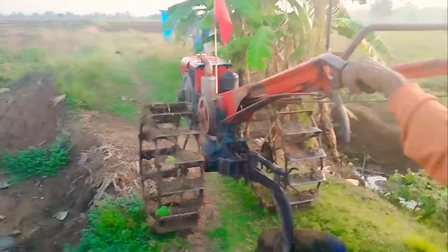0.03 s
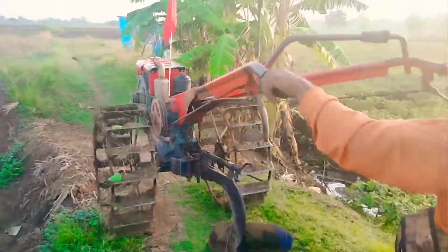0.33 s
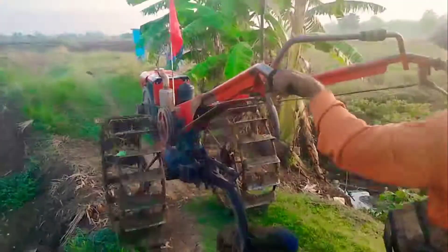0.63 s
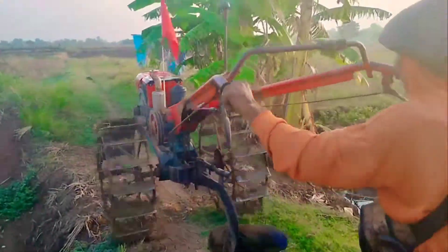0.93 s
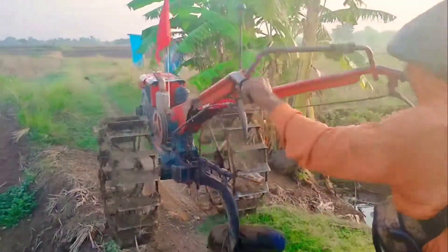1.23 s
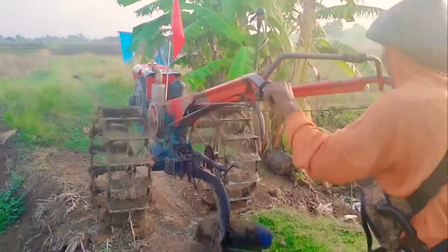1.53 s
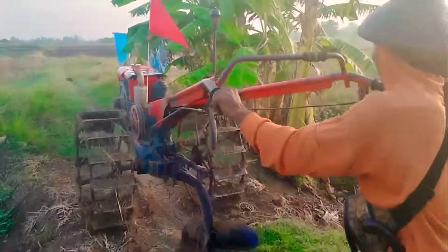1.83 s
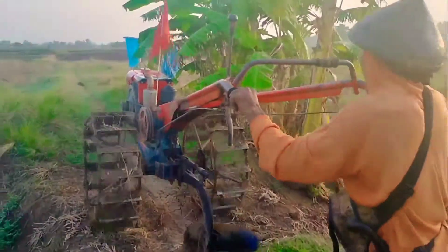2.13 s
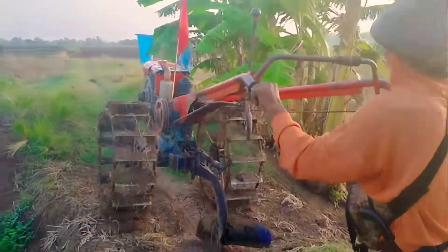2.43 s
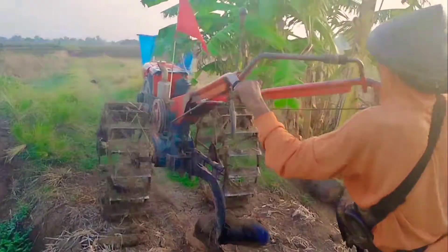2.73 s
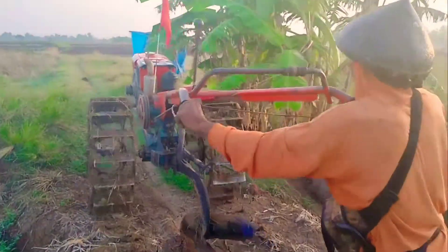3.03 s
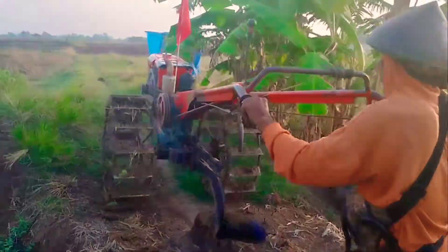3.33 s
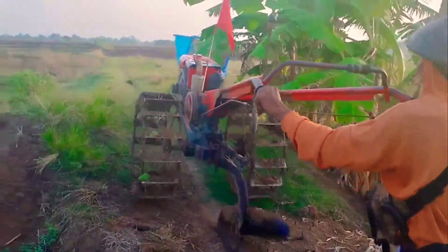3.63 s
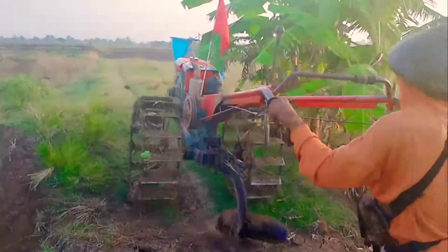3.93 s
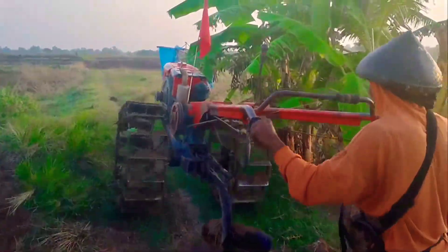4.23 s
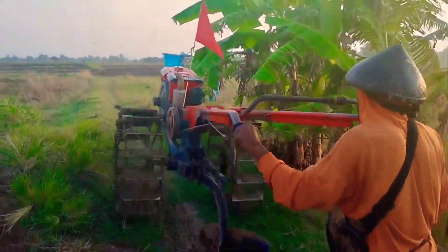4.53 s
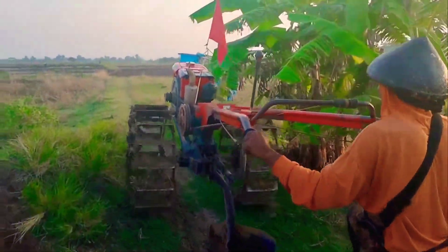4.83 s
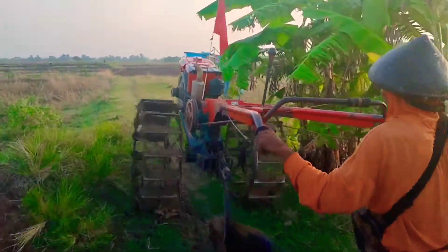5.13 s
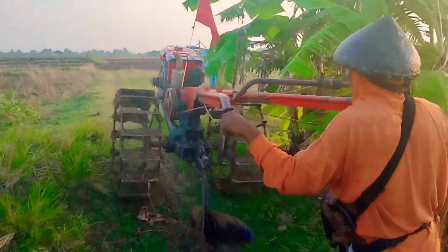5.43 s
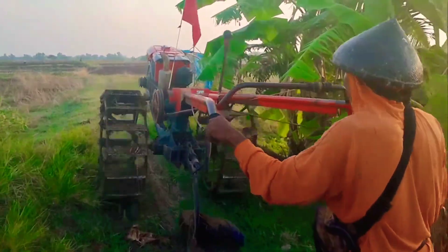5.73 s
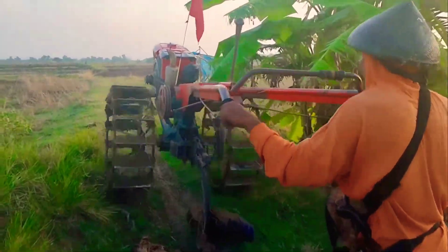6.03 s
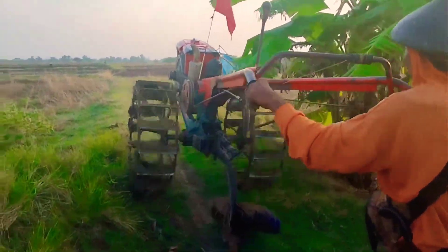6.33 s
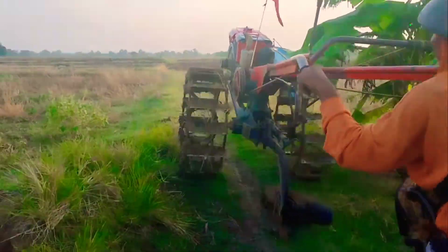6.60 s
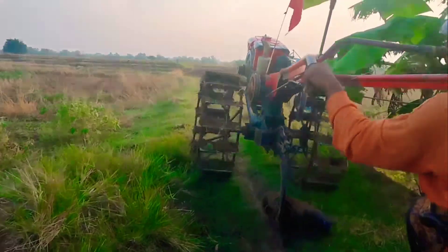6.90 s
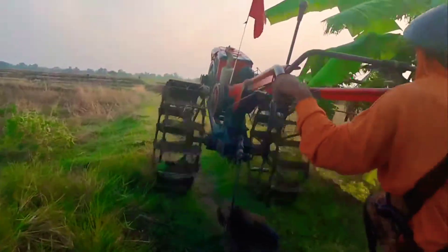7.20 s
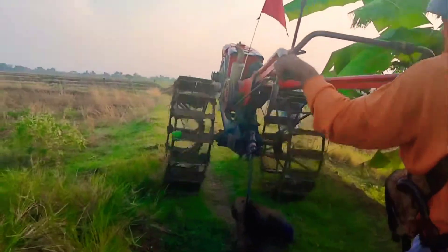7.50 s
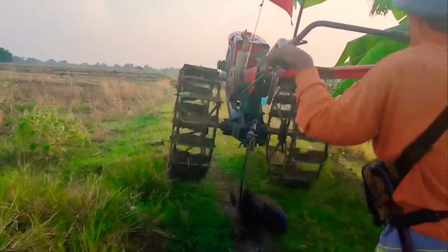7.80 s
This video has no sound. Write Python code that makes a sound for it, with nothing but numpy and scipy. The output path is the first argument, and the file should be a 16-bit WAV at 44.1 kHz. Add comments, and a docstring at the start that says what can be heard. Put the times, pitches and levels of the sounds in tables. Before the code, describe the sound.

A small single-cylinder diesel walking tractor chugs along a grassy field track, heard close from behind the handlebars. Each quick firing brings a low exhaust puff, a hard knock and clicking valves, shaking out metal clinks and rattles. Early on a belt hisses and the steel cage wheels ring faintly. Midway a rod chafes with a bright rasp, then the engine pulls harder and the clatter grows louder.

```python
"""A single-cylinder diesel walking tractor chugs along a field track, heard from behind its handlebars.
Nearly eight times a second combustion knocks the block, the valves click, the exhaust puffs and the
intake gulps. Each firing shakes the machine: the linkage clinks, and gears and tinwork clatter, more
loudly towards the end. Behind that the belt hisses, a control rod chafes, and the steel cage wheels
ring and brush through grass."""
import sys
import numpy as np
from scipy import signal
from scipy.fft import irfft
from scipy.io import wavfile

SR = 44100
rng = np.random.default_rng(int(sys.argv[2]) if len(sys.argv) > 2 else 0)


def dump(signal):
    """Clip the signal to [-1, 1] and save it as 16-bit WAV at the path in sys.argv[1]."""
    limited = np.clip(np.atleast_2d(signal).T, -1, 1)
    pcm = np.round(limited * 32767).astype(np.int16)
    wavfile.write(sys.argv[1], SR, pcm)


N = 346626
CUTOFF_HZ = 15700

# swish of grass under the wheels: time_s, level_db
GRASS_LEVEL = [(0, -52), (0.6, -69), (1.5, -74), (3.0, -63), (4.4, -61), (5.7, -66.5), (7.86, -65)]
# tone of the grass: frequency_hz, density_db
GRASS_SPECTRUM = [(2000, 2), (4000, 6), (7000, -5.5), (9000, -1), (10800, 7), (13000, 0), (15500, -27)]
# dry stalks snapping: start_s, level_db
STALK_SNAPS = [(0.03, -44.5), (0.195, -52), (0.32, -52), (0.366, -52), (0.437, -44)]
# resonances of a stalk: pitch_hz, width_hz, gain_db
STALK_MODES = [(5500, 1200, 0), (8200, 1000, -7), (10500, 1100, 2), (13000, 640, 0)]
# resonances of the steel cage wheels: pitch_hz, width_hz, gain_db
WHEEL_MODES = [(1258, 24, 0), (1288, 28, -1), (1372, 24, 0), (1462, 24, 0), (1540, 30, -3)]
# a wheel grinds over hard ground and rings up: peak_s, level_db, pitch_hz
WHEEL_SWELLS = [(0.5, -47, 1330), (0.92, -40, 1440), (1.12, -46.5, 1460), (1.55, -44.5, 1530),
                (1.73, -45, 1300), (2.33, -49.5, 1540), (2.5, -37.5, 1320), (3.42, -47, 1433),
                (5.581, -40, 1288), (6.15, -36, 1270)]
# slipping of the belt: time_s, level_db
BELT_LEVEL = [(0.1, -91), (0.3, -46.5), (1.0, -50), (1.22, -52), (1.34, -46), (1.8, -48.5), (2.9, -49),
              (3.9, -56), (4.3, -56), (5.1, -56.5), (5.6, -54), (6.4, -57), (6.72, -49), (7.15, -59)]
# tone of the belt's hiss: frequency_hz, density_db
BELT_SPECTRUM = [(2500, -19), (4300, -3), (5200, 11), (5650, 10), (5950, 6.5), (6250, 1), (6700, 3.5),
                 (7500, -13), (8700, -9), (10000, -27), (11300, -9), (12200, 2.5), (13000, -5),
                 (13800, -12), (15500, -43)]
# resonances of the pulley and belt guard: pitch_hz, width_hz, gain_db
PULLEY_MODES = [(4420, 130, -2.5), (4950, 140, 1), (5470, 130, 0), (5680, 160, 7), (6330, 120, 0.5),
                (6730, 100, -3)]
# chafing of the control rod, hardest as the handlebars swing round: time_s, level_db
ROD_LEVEL = [(0, -59), (1.0, -62), (3.5, -63), (4.06, -54.5), (4.26, -39), (4.42, -41), (4.6, -40),
             (5.0, -48.5), (5.4, -54), (6.2, -53), (6.6, -50.5), (7.2, -49.5), (7.86, -56)]
# tone of the chafing rod: frequency_hz, density_db
ROD_SPECTRUM = [(100, -55), (500, -34), (1600, -23), (2500, -3), (3500, 4), (4500, 7.5), (5100, 2.5),
                (5600, -2.5), (6200, -14.5), (8000, -20), (15000, -57)]
# how hard the tinwork is shaken: time_s, level_db
TIN_DRIVE = [(0, -39), (0.6, -44), (2.2, -44), (3.1, -42.5), (4.1, -39.5), (4.55, -35.5), (4.9, -39),
             (5.4, -42), (6.3, -37.5), (6.9, -34), (7.12, -31.5), (7.86, -34.5)]
# resonances of the loose tinwork: pitch_hz, width_hz, gain_db
TIN_MODES = [(1554, 28, 5), (1675, 54, -1), (1769, 43, 7.5), (1889, 32, 5), (3063, 54, -4),
             (3450, 190, -12.5), (3900, 180, -12), (4580, 61, -14)]
# resonances of the crankcase and gear housing: pitch_hz, width_hz, gain_db
CASING_MODES = [(488, 190, -16), (767, 81, -7), (910.4, 21.4, -2.5), (1173, 23, -6.5), (1462, 21, -3),
                (1503, 21, -17), (1925, 21, 5), (2015, 28, 4.5), (2134, 39, 1), (2231, 43, 2),
                (2450, 35, -8), (2720, 53, -8), (3006, 22, -11), (4376, 190, -15.5), (5210, 75, -15),
                (6260, 50, -13), (6730, 71, -13), (7300, 60, -29), (8000, 31, -20), (8560, 180, -26.5)]
# tone of the clattering frame: frequency_hz, density_db
FRAME_SPECTRUM = [(25, -14), (45, -25), (75, -68), (150, -4), (240, 1), (350, -7.5), (600, -24), (800, 2),
                  (2000, -2.5), (3300, -10.5), (6500, -27), (7800, -46), (10000, -41), (15500, -34)]
# resonances of the control linkage: pitch_hz, width_hz, gain_db
LINKAGE_MODES = [(1590, 150, -1), (3170, 110, -8.5), (4940, 180, -7), (4970, 220, 9), (5360, 100, -7),
                 (5720, 600, -21.5)]
# valve gear contacts, timed from the exhaust valve opening: delay_s, gain_db, t60_s
TAPPET_HITS = [(-0.029, -13, 0.05), (-0.012, -10, 0.1), (0, -1.5, 0.045), (0.012, -8, 0.16)]
# resonances of the rocker and its cover: pitch_hz, width_hz, gain_db
ROCKER_MODES = [(1200, 250, 2.5), (1670, 120, 9.5), (6200, 280, 4), (6770, 290, 2.5), (7600, 1100, 2.5),
                (10960, 290, -5), (11840, 530, 6.5), (13340, 410, 2), (14800, 500, -1)]
# strength of the intake's gulp: time_s, level_db
GULP_LEVEL = [(0, -46), (0.5, -43.5), (1.4, -49), (2.6, -45), (3.7, -54), (4.3, -46.5), (5.6, -49),
              (6.9, -58), (7.7, -50)]
# hollow resonances of the intake: pitch_hz, width_hz, gain_db
INTAKE_MODES = [(277, 52, 2), (456, 62, 9), (520, 136, -0.5)]
# low resonances of the muffler: pitch_hz, width_hz, gain_db
MUFFLER_MODES = [(172, 5.5, 10.5), (235.6, 3.3, 5.5)]
# engine speed, held by a hunting governor: time_s, firing_rate_hz
ENGINE_SPEED = [(0.0, 8.047), (0.78, 8.177), (1.4, 7.464), (1.51, 7.893), (2.17, 7.526), (2.67, 8.008),
                (4.04, 7.632), (4.4, 7.962), (5.39, 7.714), (5.52, 7.308), (5.76, 7.72), (5.97, 7.506),
                (6.14, 8.01), (7.37, 7.919), (7.42, 7.562), (7.86, 8.087)]
# how hard the engine pulls, from 0 to 1: time_s, load_fraction
ENGINE_LOAD = [(0, 0.36), (1.0, 0.25), (2.3, 0.07), (3.3, 0.21), (4.3, 0), (4.9, 0.26), (5.35, 0.48),
               (5.8, 0.89), (6.3, 0.71), (6.9, 0.95), (7.3, 0.96), (7.86, 0.97)]
# strength of an ordinary combustion knock: time_s, block_db, chamber_db
KNOCK_LEVEL = [(0, -41, -36), (2.9, -39.5, -48), (4.0, -35.5, -33), (5.9, -33, -36), (7.86, -33, -30)]
# firings with strengths of their own, some softer and some harder: time_s, block_db, chamber_db, valve_lag_s,
# valve_db, clink_db, clink_hz
LISTED_FIRINGS = [(0.1482, -32.5, -42.5, 0.027, -49.5, -55.5, 4670),
                  (0.2686, -40.0, -44.5, 0.028, -53.5, -42.5, 4880),
                  (0.3926, -38.0, -40.5, 0.027, -44.0, -47.0, 5310),
                  (0.8811, -33.0, -43.5, 0.029, -63.0, -54.0, 4650),
                  (1.0137, -37.0, -46.5, 0.025, -48.0, -44.0, 5260),
                  (1.2638, -37.5, -43.5, 0.029, -44.5, -43.0, 5180),
                  (1.3966, -36.0, -43.0, 0.029, -44.0, -37.0, 5180),
                  (1.5276, -33.0, -41.5, 0.028, -45.0, -40.5, 5230),
                  (1.6559, -35.5, -38.0, 0.027, -48.0, -42.0, 4760),
                  (1.9127, -32.0, -43.0, 0.029, -48.0, -49.5, 5310),
                  (2.0413, -38.0, -43.5, 0.031, -50.0, -37.0, 4980),
                  (2.1756, -34.0, -40.5, 0.029, -42.5, -38.5, 5080),
                  (2.3083, -31.5, -36.5, 0.029, -43.0, -46.5, 5440),
                  (2.437, -33.0, -46.5, 0.029, -45.5, -44.5, 5170),
                  (2.5656, -33.5, -44.0, 0.029, -46.5, -44.0, 5010),
                  (2.692, -34.5, -46.0, 0.027, -47.5, -40.0, 4990),
                  (2.9437, -37.0, -40.5, 0.026, -47.0, -48.5, 5040),
                  (3.0711, -40.0, -40.0, 0.026, -48.5, -55.0, 4950),
                  (3.3221, -34.0, -36.0, 0.026, -47.0, -47.5, 4660),
                  (3.4509, -36.5, -40.5, 0.027, -45.5, -44.0, 5100),
                  (3.7091, -33.0, -33.5, 0.029, -43.5, -41.0, 4900),
                  (3.8399, -35.0, -31.0, 0.027, -47.5, -41.5, 4930),
                  (3.9682, -39.0, -33.5, 0.025, -51.5, -48.5, 4990),
                  (4.0989, -32.5, -29.0, 0.028, -43.0, -34.5, 5020),
                  (4.2278, -31.5, -31.5, 0.025, -48.5, -32.5, 4940),
                  (4.3581, -31.0, -30.5, 0.026, -47.0, -29.5, 4980),
                  (4.4836, -32.0, -30.0, 0.027, -48.0, -33.0, 5150),
                  (4.6083, -37.5, -31.0, 0.026, -54.0, -35.0, 4850),
                  (4.862, -31.0, -29.0, 0.028, -44.5, -33.5, 4970),
                  (4.9916, -34.0, -28.5, 0.029, -49.0, -39.5, 4840),
                  (5.119, -33.0, -28.5, 0.028, -47.5, -37.5, 4870),
                  (5.2487, -35.5, -33.0, 0.027, -48.5, -38.5, 5030),
                  (5.3752, -31.5, -34.5, 0.029, -51.5, -43.5, 5010),
                  (5.5066, -27.5, -31.0, 0.031, -46.0, -43.5, 5020),
                  (5.7737, -28.0, -28.5, 0.03, -44.0, -38.0, 4940),
                  (6.0372, -30.0, -29.5, 0.028, -43.5, -38.0, 5160),
                  (6.1663, -36.0, -33.0, 0.025, -50.0, -42.0, 4650),
                  (6.2919, -36.0, -31.0, 0.025, -51.0, -48.5, 4760),
                  (6.4185, -33.5, -34.0, 0.025, -46.0, -41.0, 5170),
                  (6.6687, -31.0, -35.0, 0.027, -43.0, -38.0, 4900),
                  (6.7898, -27.5, -38.0, 0.025, -57.5, -50.0, 5010),
                  (6.918, -26.5, -36.5, 0.026, -49.0, -40.5, 4940),
                  (7.0442, -28.5, -31.5, 0.028, -47.5, -38.0, 4650),
                  (7.1693, -31.0, -33.0, 0.027, -50.0, -43.0, 4660),
                  (7.2975, -33.0, -36.0, 0.026, -49.0, -44.5, 5170),
                  (7.5512, -25.5, -35.0, 0.03, -48.0, -42.0, 5000),
                  (7.683, -26.5, -33.5, 0.026, -49.0, -45.5, 4650),
                  (7.8072, -26.5, -30.0, 0.027, -51.0, -40.5, 4720)]
# resonances of the cylinder block: pitch_hz, width_hz, gain_db
BLOCK_MODES = [(413, 77, -32), (718, 50, 0.5), (957, 86, 1.5), (1210, 76, 1), (1530, 61, 6.5),
               (1942, 83, 10.5), (2100, 68, 8), (2424, 47, 4.5), (2730, 146, -1), (3400, 75, -11),
               (3900, 280, -10.5)]
# resonances of the exhaust port and pipe: pitch_hz, width_hz, gain_db
PORT_MODES = [(970, 260, -5.5), (1490, 130, -6), (1730, 81, 9), (2160, 270, -11)]
# gas pulses after a firing (blow-down, rising as the pipe fills; its first crack; intake pop; its tail;
# closing intake valve; firing thud): delay_s, pitch_hz, glide_hz_per_s, gain_db, swell_s, sharpness
GAS_PULSES = [(0.0241, 112, 1815, 7, 0.0131, 1.7), (0.0296, 145, 3000, 4.5, 0.0031, 2.6),
              (0.0607, 222, 1400, 2.5, 0.0056, 3.3), (0.0636, 177, -170, -7.5, 0.0098, 0.7),
              (0.098, 232, 0, -2.5, 0.008, 1.0), (0.0005, 346, 0, -11.5, 0.0026, 2)]


def from_db(db):
    """Decibels to amplitude."""
    return 10 ** (np.asarray(db) / 20)


def curve(rows, times=None):
    """A curve read at the given times, or else at every sample."""
    return np.interp(np.arange(N) / SR if times is None else times, *np.transpose(rows))


def burst(rise, t60, size=8192):
    """Envelope of a blow: quick rise, exponential fall, peak 1."""
    t = np.arange(size) / SR
    shape = (1 - np.exp(-t / rise)) * from_db(-60 * t / t60)
    return shape / shape.max()


def swelling(t, swell_s, sharpness):
    """Envelope of a gas pulse, peaking at swell_s; low sharpness gives a sudden start and a long tail."""
    return (t / swell_s * np.exp(1 - t / swell_s)) ** sharpness


def strike(times, db, shape):
    """One copy of a shape at each time, at the given level."""
    out = np.zeros(N + SR)
    for at, gain in zip(np.round(np.maximum(times, 0) * SR).astype(int), from_db(db)):
        out[at:at + len(shape)] += gain * shape
    return out[:N]


def grains(per_s, spread_db):
    """Tiny contacts of uneven strength at random moments; rms 1."""
    at, clicks = np.flatnonzero(rng.random(N) < per_s / SR), np.zeros(N)
    sign = np.sign(rng.random(N)[at] - .5)
    clicks[at] = sign * from_db(spread_db * np.clip(rng.standard_normal(N)[at], -2, 2))
    return clicks / np.std(clicks)


def through(x, response):
    """Filter that keeps the power of white noise."""
    return signal.oaconvolve(x, response / np.linalg.norm(response))[:N]


def resonate(x, modes, size=8192):
    """Damped modes ring in parallel."""
    t = np.arange(size) / SR
    rings = [(-1) ** k * from_db(db) * width * np.exp(-np.pi * width * t) * np.sin(2 * np.pi * hz * t)
             for k, (hz, width, db) in enumerate(modes)]
    return through(x, sum(rings))


def colour(x, spectrum, size=4096):
    """Smooth EQ for a noise bed."""
    hz, db = np.transpose(spectrum)
    gain = from_db(np.interp(np.log(np.fft.rfftfreq(size, 1 / SR) + 1), np.log(hz), db))
    response = np.fft.fftshift(irfft(gain))
    return signal.oaconvolve(x, response / np.linalg.norm(response), mode="same")


def diffuse(x, t60, wet_db, size=2048):
    """Countless brief modes add a short, dense tail."""
    tail = rng.standard_normal(size) * from_db(-60 * np.arange(size) / SR / t60)
    return through(x, signal.unit_impulse(size) + from_db(wet_db) * tail / np.linalg.norm(tail))


def rattle(shake, modes, per_s, spread_db, wander_db, wander_hz):
    """Small contacts ring the modes; as the contact points shift, each mode swells and fades. Rms 1."""
    hits = [shake * grains(per_s, spread_db) for _ in range(min(3, len(modes)))]
    steps, out = np.arange(N) / SR * wander_hz, np.zeros(N)
    for k, (hz, width, db) in enumerate(modes):
        radius = np.exp(-np.pi * width / SR)
        gain = (1 - radius ** 2) / 2
        feedback = [1, -2 * radius * np.cos(2 * np.pi * hz / SR), radius ** 2]
        ring = signal.lfilter([gain, 0, -gain], feedback, hits[k % len(hits)])
        swell = np.interp(steps, np.arange(256), from_db(db + wander_db * rng.standard_normal(256)))
        # the skirts of a mode radiate poorly
        skirts = signal.butter(1, [hz / 2, min(hz * np.sqrt(2), CUTOFF_HZ)], "band", fs=SR, output="sos")
        out += swell * signal.sosfilt(skirts, ring)
    return out / np.std(out)


def blows(times, db, modes, rise, t60, vary_db, detune, tuning=1, size=3072):
    """Each blow is a dying chatter that rings the modes in a new mix; db is its energy over 10 ms."""
    t, out = np.arange(size) / SR, np.zeros(N + SR)
    hz, width, mode_db = np.transpose(modes)[..., None]
    decays = width * np.exp(-np.pi * width * t)
    envelope = burst(rise, t60, size)
    signs = (-1) ** np.arange(len(modes))[:, None]
    radiated = signal.butter(2, [hz.min() / 2, min(hz.max() * 2, CUTOFF_HZ)], "band", fs=SR, output="sos")
    for start, gain, pitch in zip(times, from_db(db), tuning * np.ones(len(times))):
        loud, sharp = rng.standard_normal((2, len(modes), 1))
        tones = np.sin(2 * np.pi * hz * pitch * (1 + detune * sharp) * t)
        rings = signs * from_db(mode_db + vary_db * loud) * decays * tones
        chatter = envelope * rng.laplace(size=size)
        sound = signal.sosfilt(radiated, signal.fftconvolve(chatter, rings.sum(0))[:size])
        at = max(round(start * SR), 0)
        out[at:at + size] += gain * sound * np.sqrt(SR / 100) / np.linalg.norm(sound)
    return out[:N]


def shaking(times, t60, depth, uneven_db=2.5):
    """Every cycle jolts the machine, never equally hard, and the rattling settles until the next."""
    jolt_db = uneven_db * rng.standard_normal(len(times))
    return 1 + depth * strike(times, jolt_db, burst(rise=0.003, t60=t60))


def grass(swing):
    """Grass brushes the wheels in a bright, crackly swish that surges with each swing."""
    brushing = colour(swing * grains(per_s=3000, spread_db=21), GRASS_SPECTRUM)
    return from_db(curve(GRASS_LEVEL)) * diffuse(brushing, t60=0.075, wet_db=5)


def stalks():
    """Dry stalks snap under the wheels."""
    times, db = np.transpose(STALK_SNAPS)
    return blows(times, db, STALK_MODES, rise=0.001, t60=0.05, vary_db=5, detune=0.05)


def wheels(shake, steady_db=-44, swell_s=0.075, focus_hz=55):
    """The steel cages ring all the time; grinding over hard ground swells the modes near one pitch."""
    t, out = np.arange(N) / SR, 0
    peak_s, db, ring_hz = np.transpose(WHEEL_SWELLS)
    nearness = np.exp(-((np.array(WHEEL_MODES)[:, :1] - ring_hz) / focus_hz) ** 2)
    swells = from_db(db)[:, None] ** 2 * np.exp(-((t - peak_s[:, None]) / swell_s) ** 2)
    for (hz, width, mode_db), share in zip(WHEEL_MODES, nearness / nearness.sum(0)):
        power = from_db(steady_db + mode_db) ** 2 / len(WHEEL_MODES) + share @ swells
        ring = rattle(shake, [(hz, width, 0)], per_s=900, spread_db=4.5, wander_db=2, wander_hz=9)
        out += np.sqrt(power) * ring
    return out


def belt(swing, hiss_db=-4.5, scrape_db=-2):
    """The slipping belt hisses and scrapes the pulley and its guard."""
    slips = colour(swing * grains(per_s=4000, spread_db=11), BELT_SPECTRUM)
    hiss = diffuse(slips, t60=0.031, wet_db=11)
    scrape = rattle(swing, PULLEY_MODES, per_s=900, spread_db=6, wander_db=4.5, wander_hz=18)
    return from_db(curve(BELT_LEVEL)) * (from_db(hiss_db) * hiss + from_db(scrape_db) * scrape)


def control_rod(swing):
    """The rod chafes in dense, tiny slips that surge with each swing."""
    slips = colour(swing * grains(per_s=3000, spread_db=7), ROD_SPECTRUM)
    return from_db(curve(ROD_LEVEL)) * diffuse(slips, t60=0.02, wet_db=0)


def tinwork(shake, lift_db=-42):
    """The tinwork's buzz opens up as the shaking lifts it off its seat."""
    drive_db = curve(TIN_DRIVE)
    looseness = 1 / (1 + from_db(2.4 * (lift_db - drive_db)))
    buzz = rattle(shake, TIN_MODES, per_s=900, spread_db=10, wander_db=4, wander_hz=14)
    return looseness * from_db(drive_db) * buzz


def gear_whine(load, idle_db=-50.5, rise_db=16):
    """The gear mesh keeps one narrow resonance singing, which only stands out near full load."""
    tone = resonate(rng.standard_normal(N), [(1015, 22, 0)])
    level = from_db(idle_db + rise_db * load ** 9.8)
    return level * signal.sosfilt(signal.butter(2, 850, "high", fs=SR, output="sos"), tone)


def gearbox(shake, load, casing_db=-43, frame_db=-50.5, rise_db=4):
    """Gear teeth rattle the casing and the frame, harder under load."""
    casing = rattle(shake, CASING_MODES, per_s=700, spread_db=4, wander_db=3.2, wander_hz=14)
    clatter = colour(shake * grains(per_s=4000, spread_db=4.5), FRAME_SPECTRUM)
    frame = diffuse(clatter, t60=0.079, wet_db=-1)
    return from_db(rise_db * load) * (from_db(casing_db) * casing + from_db(frame_db) * frame)


def linkage(opened, clink_db, clink_hz, nominal_hz=5000):
    """The slack linkage is thrown against its stops each cycle, at a pitch set by where it lands."""
    return blows(opened - 0.0015, clink_db, LINKAGE_MODES, rise=0.00029, t60=0.074,
                 vary_db=5.5, detune=0.0039, tuning=clink_hz / nominal_hz)


def valves(opened, valve_db):
    """Loose tappets and rockers click, each time in another colour; the exhaust valve opens hardest."""
    return sum(blows(opened + delay, valve_db + db, ROCKER_MODES, rise=0.001, t60=t60,
                     vary_db=3, detune=0.03, size=2048) for delay, db, t60 in TAPPET_HITS)


def intake(fired):
    """The intake takes one hollow gulp a cycle."""
    gulp_db = curve(GULP_LEVEL, fired)
    return blows(fired + 0.0625, gulp_db, INTAKE_MODES, rise=0.00077, t60=0.019, vary_db=5, detune=0.017)


def muffler(fired, exhaust_db, gain_db=-15):
    """Rushing gas keeps the muffler droning between puffs."""
    flow = strike(fired + 0.047, exhaust_db, burst(rise=0.0051, t60=0.19))
    return from_db(gain_db) * resonate(rng.standard_normal(N) * flow, MUFFLER_MODES)


def firing_times(first_s=0.02):
    """The cylinder fires each time the crank completes a cycle."""
    t = np.arange(N) / SR
    cycles = np.cumsum(curve(ENGINE_SPEED)) / SR
    cycles -= np.interp(first_s, t, cycles)
    return np.interp(np.arange(np.ceil(cycles[-1])), cycles, t)


def strokes(fired):
    """Every cycle hits a little differently; each listed firing takes the place of the nearest one."""
    block, chamber, valve, clink, pitch = rng.standard_normal((len(fired), 5)).T
    times, block_db, chamber_db = np.transpose(KNOCK_LEVEL)
    block_db = np.interp(fired, times, block_db) - 2.5 * block
    chamber_db = np.interp(fired, times, chamber_db) - 2.5 * chamber
    valve_lag_s, valve_db = np.full(len(fired), 0.027), -54 - 5 * valve
    clink_db, clink_hz = -52 + 1.5 * clink, 5000 * (1 + 0.019 * pitch)
    rows = np.column_stack([fired, block_db, chamber_db, valve_lag_s, valve_db, clink_db, clink_hz])
    for listed in LISTED_FIRINGS:
        rows[np.argmin(abs(fired - listed[0]))] = listed
    return rows.T


def chamber_ring(fired, chamber_db, start_hz=2050, hot_hz=2820, heating_s=0.0045, size=1400):
    """Burning gas rings in the chamber, a rough chirp that shoots up as it heats."""
    t, out = np.arange(size) / SR, np.zeros(N + SR)
    hz = hot_hz + (start_hz - hot_hz) * np.exp(-t / heating_s)
    envelope = swelling(t, swell_s=0.003, sharpness=0.9)
    for start, gain in zip(fired, from_db(chamber_db)):
        detune, roughness = 0.05 * rng.standard_normal(), 0.38 * rng.standard_normal(size)
        phase = 2 * np.pi * np.cumsum(hz * (1 + detune + roughness)) / SR
        at = max(round(start * SR), 0)
        out[at:at + size] += gain * envelope * np.sin(phase)
    return out[:N]


def knock(fired, block_db, chamber_db):
    """Combustion rings the chamber and hammers the block; the gas then barks out through the port."""
    ring = chamber_ring(fired - 0.0012, chamber_db)
    block = blows(fired - 0.0015, block_db, BLOCK_MODES, rise=0.0003, t60=0.028, vary_db=2, detune=0.015)
    bark = blows(fired + 0.025, chamber_db - 8, PORT_MODES, rise=0.0024, t60=0.055,
                 vary_db=6, detune=0.037)
    return ring + block + bark


def chug(fired, exhaust_db, uneven_db=1, detune=0.02, scatter_s=0.0004, size=3500):
    """Each gas pulse swells and dies as a low tone of its pipe, nearly alike from cycle to cycle."""
    t, out = np.arange(size) / SR, np.zeros(N + SR)
    for delay, hz, glide, db, swell_s, sharpness in GAS_PULSES:
        envelope = swelling(t, swell_s, sharpness)
        phase = 2 * np.pi * (hz + glide * t / 2) * t
        for start, level_db in zip(fired, exhaust_db):
            loud, sharp, late = rng.standard_normal(3)
            gain = from_db(level_db + db + uneven_db * loud)
            at = max(round((start + delay + scatter_s * late) * SR), 0)
            out[at:at + size] += gain * envelope * np.sin(phase * (1 + detune * sharp))
    # an open pipe radiates almost no deep bass
    return signal.sosfiltfilt(signal.butter(2, 72, "high", fs=SR, output="sos"), out[:N])


def scene():
    """The chug and knock of each cycle, over the bed of rattles that they shake out of the machine."""
    fired, block_db, chamber_db, valve_lag_s, valve_db, clink_db, clink_hz = strokes(firing_times())
    opened = fired + valve_lag_s   # the exhaust valve opens
    load = curve(ENGINE_LOAD)
    exhaust_db = -41.5 + 5.5 * curve(ENGINE_LOAD, fired)
    shake = shaking(fired, t60=0.73, depth=0.5)
    # the handlebars and belt swing a little after the block
    swing = shaking(fired + 0.021, t60=0.52, depth=0.51)
    engine = chug(fired, exhaust_db) + knock(fired, block_db, chamber_db)
    clicks = valves(opened, valve_db) + linkage(opened, clink_db, clink_hz) + stalks()
    rattles = gearbox(shake, load) + gear_whine(load) + wheels(shake) + tinwork(shake)
    friction = control_rod(swing) + belt(swing) + grass(swing)
    breath = muffler(fired, exhaust_db) + intake(fired)
    return (engine + clicks + rattles + friction + breath)[None]


def record(dry):
    """A steep low-pass takes off the very top."""
    return signal.sosfilt(signal.ellip(12, .1, 80, CUTOFF_HZ, fs=SR, output="sos"), dry)


dry = scene()
out = record(dry)
dump(out)
```